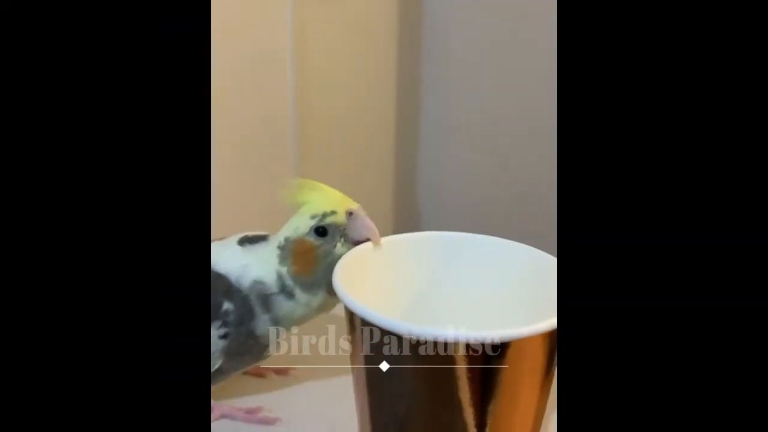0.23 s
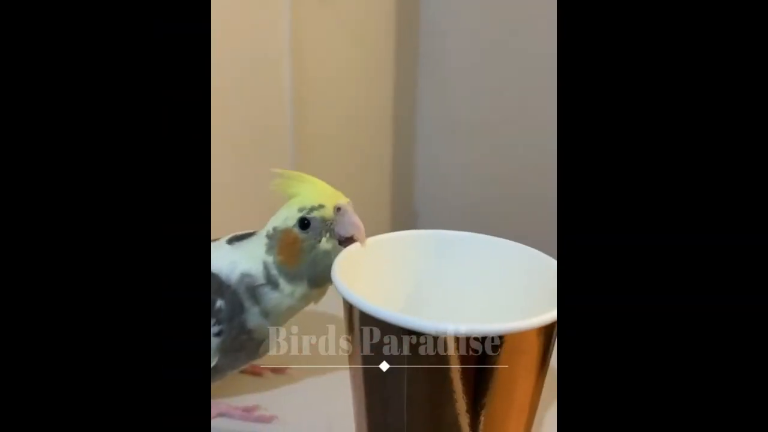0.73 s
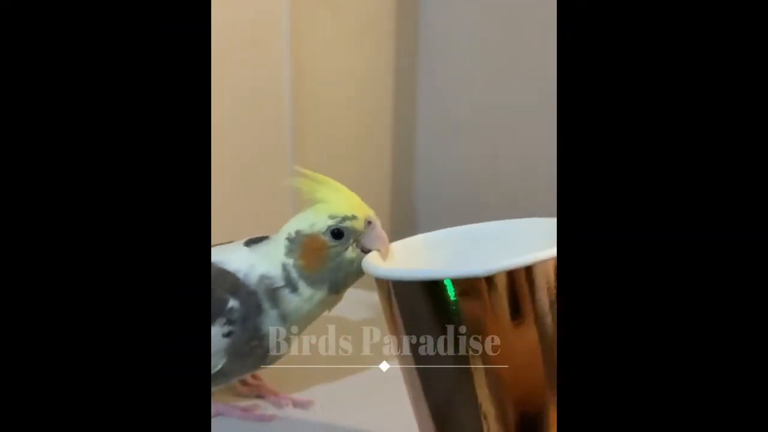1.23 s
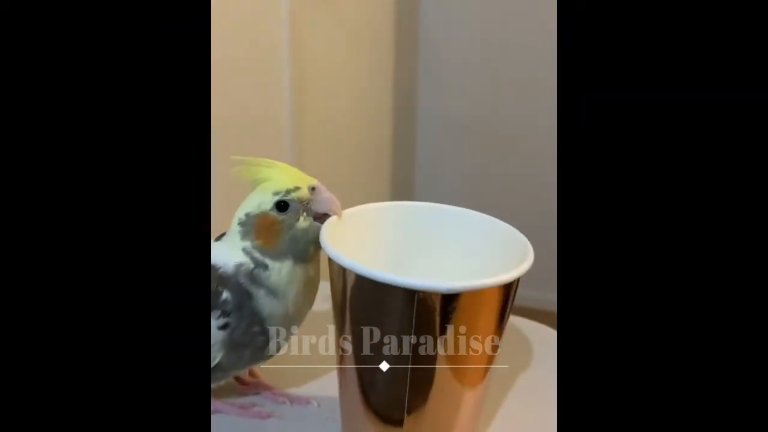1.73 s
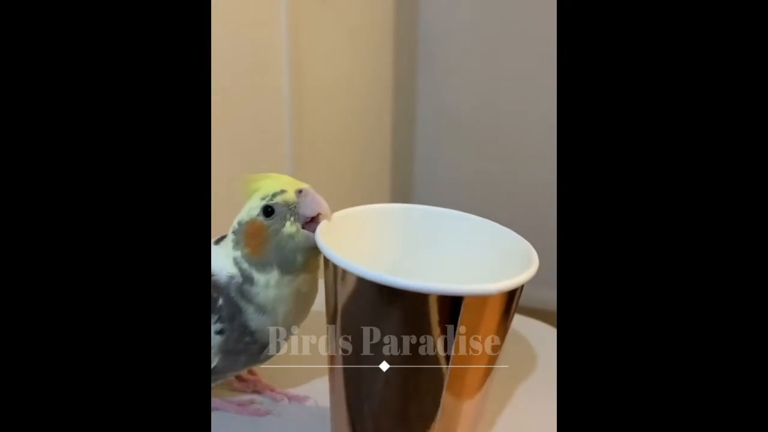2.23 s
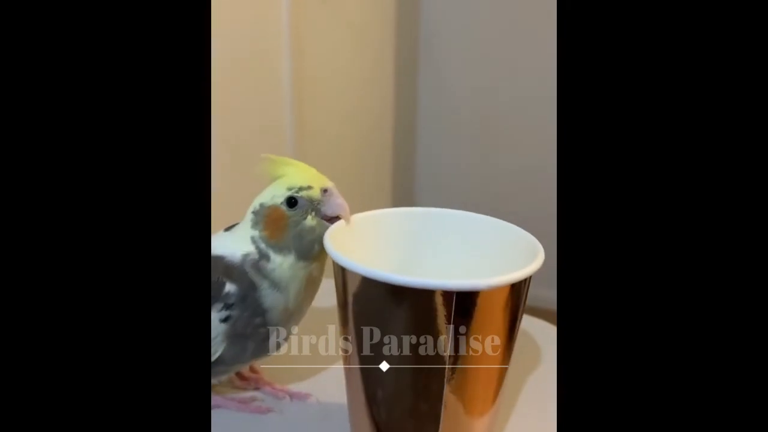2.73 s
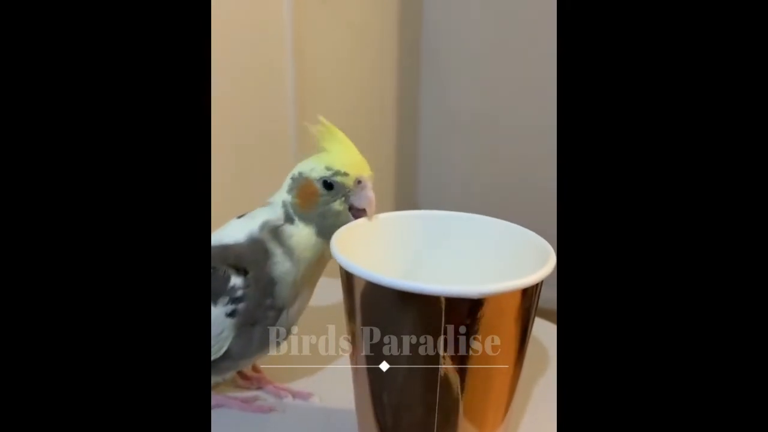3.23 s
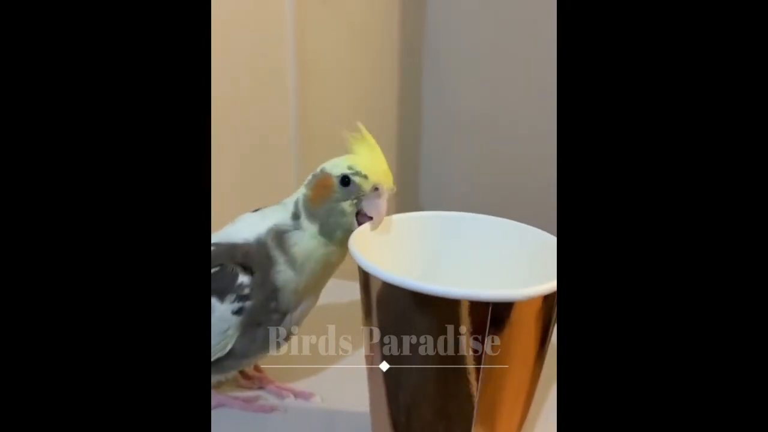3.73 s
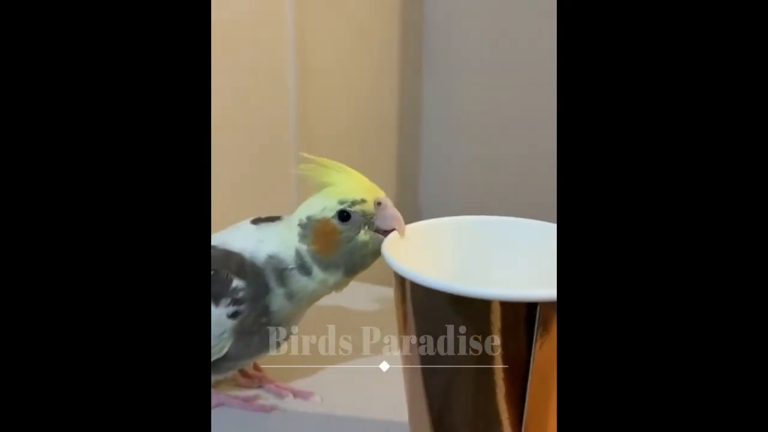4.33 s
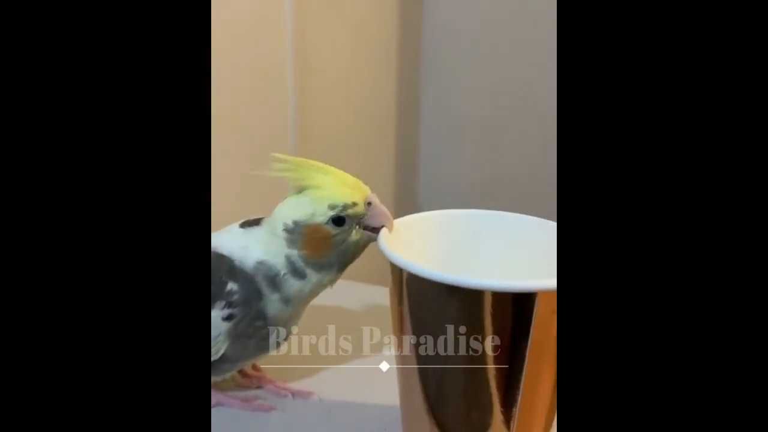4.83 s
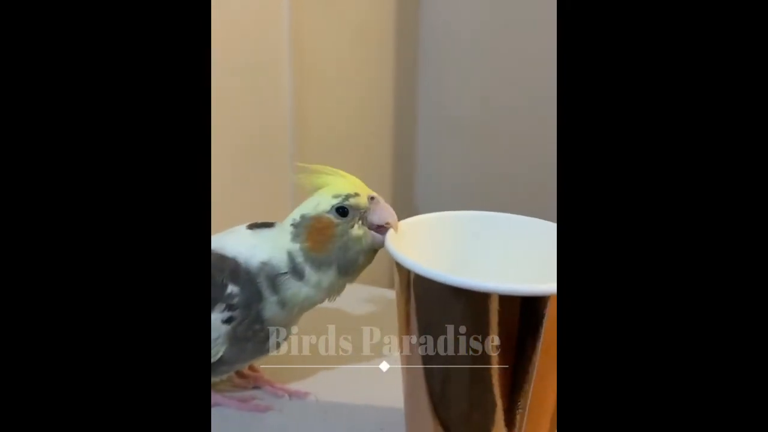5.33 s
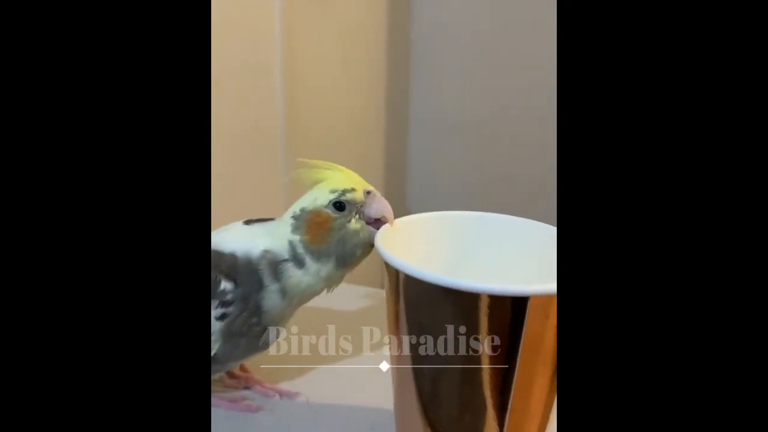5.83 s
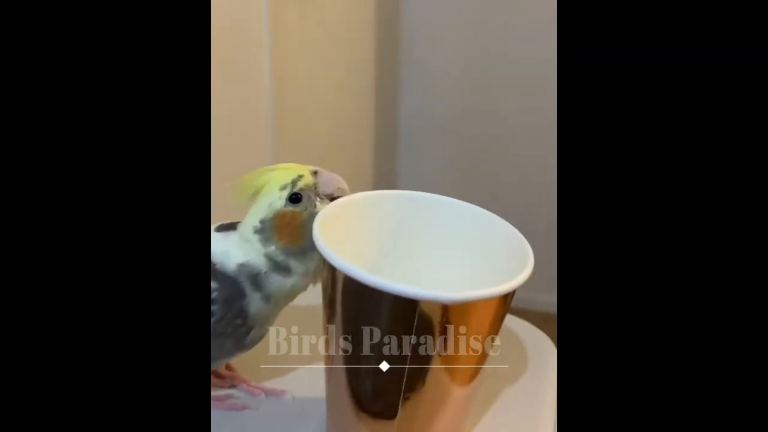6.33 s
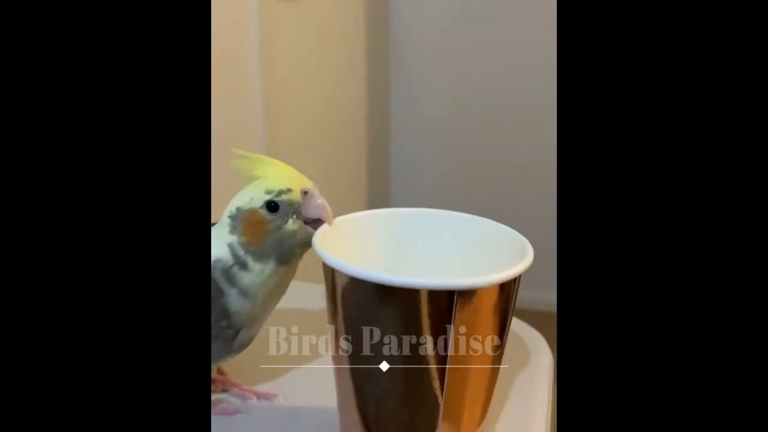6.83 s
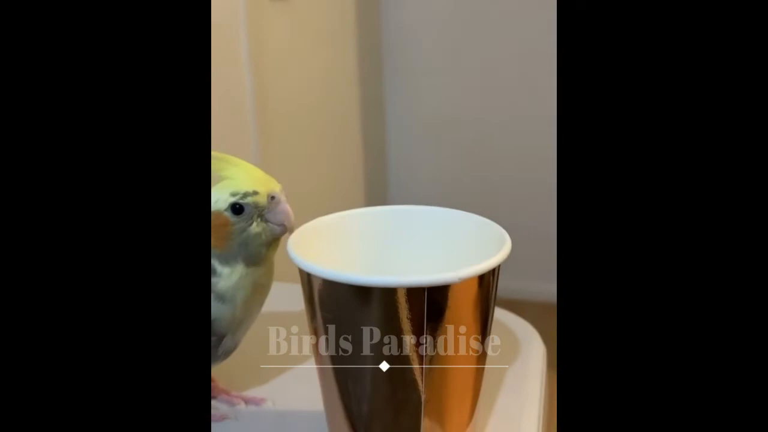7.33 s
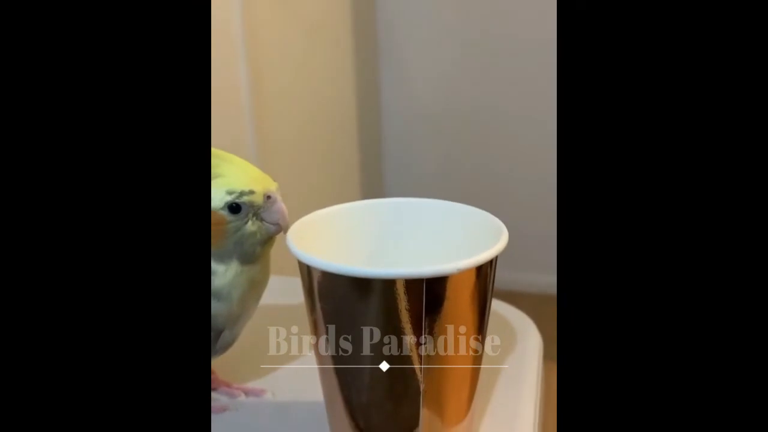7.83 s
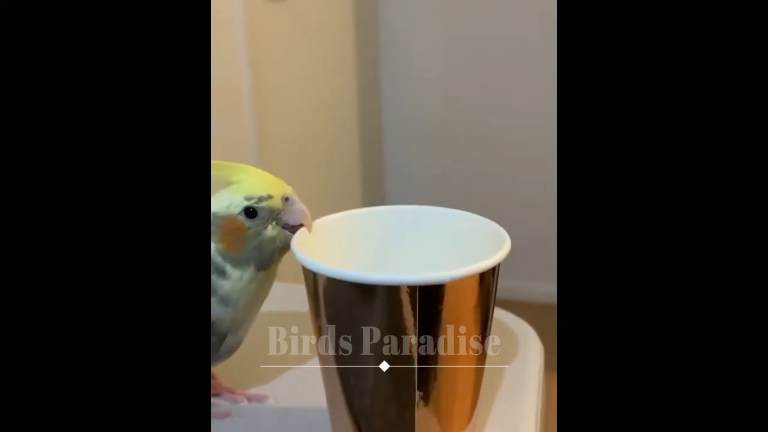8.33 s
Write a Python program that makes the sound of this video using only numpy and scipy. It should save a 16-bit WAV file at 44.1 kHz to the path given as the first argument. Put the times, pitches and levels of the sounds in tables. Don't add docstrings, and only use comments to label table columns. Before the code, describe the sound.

Irregular hollow taps and dry scratchy nibbles of a beak on an empty paper cup, with soft table thumps in a quiet room.

```python
import sys
import numpy as np
from scipy import signal
from scipy.fft import rfft, irfft
from scipy.io import wavfile
from scipy.ndimage import uniform_filter1d

SR = 44100
rng = np.random.default_rng(int(sys.argv[2]) if len(sys.argv) > 2 else 0)


def boost(x):
    u = np.asarray(x, float) / 20
    return 10 ** u


def dump(signal):
    limited = np.clip(np.atleast_2d(signal).T, -1, 1)
    pcm = np.round(limited * 32767).astype(np.int16)
    wavfile.write(sys.argv[1], SR, pcm)


N = 378378

# frequency in Hz, width in Hz, level in dB.
HOLLOW_MODES = [(432.7, 14, -16), (556.4, 56, -10.5), (663.2, 51.7, 6), (705, 86, 3)]
WALL_MODES = [(1123, 101, -2), (1197, 50.6, 5)]
RIM_MODES = [(1260, 410, -4.5), (1680, 180, -3.5), (2402, 110, 3), (3008, 244, 6.5), (3150, 750, 1),
             (4220, 850, 0.5)]
PAPER_MODES = [(5760, 246, 11), (7400, 670, 1.5), (9060, 310, 5), (9900, 364, 5), (11800, 600, -32.5)]
SHEET_MODES = [(288, 240, 2), (940, 132, 5.5), (1381, 296, 4), (1790, 365, -0.5), (2312, 590, -4.5),
               (3700, 1100, -15.5)]


def unit(x):
    return x / np.sqrt(np.mean(x ** 2))


def ring(x, modes, shift=0.9255, order=1):
    out = 0
    for k, (hz, width, db) in enumerate(modes):
        centre = min(shift * hz, 0.45 * SR)
        q = shift * hz / (width * order ** 0.94)
        b, a = signal.iirpeak(centre, q, fs=SR)
        cascade = np.tile(np.r_[b, a], (order, 1))
        out = out + (-1) ** k * boost(db) * signal.sosfilt(cascade, x)
    return out


def shaped(table):
    hz, db = np.transpose(table)
    log_f = np.log(np.fft.rfftfreq(N, 1 / SR) + 1)
    spectrum = rfft(rng.standard_normal(N)) * boost(np.interp(log_f, np.log(hz), db))
    return unit(irfft(spectrum, N))


def walk(rate):
    k = int(SR / rate)
    steps = np.repeat(rng.standard_normal(N // k + 1), k)
    return unit(uniform_filter1d(steps, k)[:N])


def add(out, s, sound, db):
    i = int(s * SR)
    part = sound[:N - i]
    out[i:i + len(part)] += part * boost(db) / np.max(np.abs(sound))


def burst(decay_s, rise_s=0.00039):
    t = np.arange(2000) / SR
    return rng.standard_normal(len(t)) * np.exp(-t / decay_s) * (1 - np.exp(-t / rise_s))


def room():
    # frequency in Hz, level in dB per Hz.
    mid_spectrum = [(12, -21), (20, -5.5), (49, 3), (240, -7.5), (742, -17.5), (4000, -53.5), (5200, -75),
                    (8800, -120)]
    side_spectrum = [(20, -20.5), (51, -10.5), (230, -14), (313, -11), (420, -12.5), (4000, -43),
                     (5200, -71), (8800, -120)]
    # frequency in Hz, width in Hz, level in dB.
    machines = [(75.3, 5.7, -63.5), (99.8, 2.2, -67.5), (139.3, 3.5, -64.5), (267.6, 9.2, -75)]
    mid_db, side_db, waver_db = -58, -64, 2.5
    hum = 0
    for hz, width, db in machines:
        tone = unit(ring(rng.standard_normal(N), [(hz, width, 0)], 0.98))
        hum = hum + boost(db + waver_db * walk(2.6)) * tone
    mid = boost(mid_db + 0.5 * walk(0.58)) * shaped(mid_spectrum) + hum
    side = boost(side_db + 0.8 * walk(2.8)) * shaped(side_spectrum)
    side = side + 0.15 * mid + 0.16 * np.roll(mid, shift=9000)
    return np.array([mid + side, mid - side])


def air_hiss():
    # frequency in Hz, level in dB per Hz.
    hiss_spectrum = [(2500, -33), (3500, -17), (5000, 3), (12500, 0.5), (13500, -43)]
    hiss_db = -87.5
    common = boost(hiss_db + 0.53 * walk(5.3)) * shaped(hiss_spectrum)
    stray = boost(hiss_db - 1) * np.array([shaped(hiss_spectrum), shaped(hiss_spectrum)])
    return common, stray


def pecks(blow_s=0.0013):
    # start in seconds, hollow ring peak in dB, ring pitch in Hz,
    # upper wall mode in dB relative to the ring.
    hard_pecks = [(0.169, -28.5, 705, -17), (0.241, -18, 640, -17), (0.267, -20, 574, -5.5),
                  (0.486, -24, 675, -26), (0.499, -30, 600, -0.5), (0.767, -21.5, 662, -17),
                  (0.852, -18.5, 665, -12.5), (0.874, -24.5, 720, -13), (0.949, -26, 680, -27),
                  (0.985, -18, 668, -37), (1.105, -26.5, 655, -15), (1.24, -20, 670, -28),
                  (1.283, -12, 622, -16), (1.294, -17, 640, -6.5), (1.322, -27.5, 640, -20),
                  (2.617, -28, 641, -17), (2.65, -30.5, 644, -11.5), (3.507, -25.5, 654, -9),
                  (3.926, -23, 640, -19), (3.957, -20, 572, -9), (4.092, -18, 648, -12.5),
                  (4.988, -31, 676, -7), (5.254, -29, 614, -6.5), (6.159, -20.5, 662, -22),
                  (6.172, -30.5, 670, -22), (6.202, -36, 660, -12), (6.207, -20, 622, -21),
                  (6.219, -15.5, 630, -25), (6.2255, -18.5, 631, -18), (6.234, -26, 680, -19),
                  (6.264, -26, 640, -31), (6.683, -22.5, 668, -22), (6.687, -26, 656, -22),
                  (6.697, -17.5, 648, -26), (6.707, -28, 655, -22), (6.717, -22.5, 717, -19),
                  (6.7245, -23, 795, 2.5), (6.733, -29, 686, -4), (0.888, -25.5, 686, -16),
                  (0.958, -25.5, 692, -16.5), (7.098, -30.5, 710, -26), (7.119, -26, 650, -35),
                  (6.954, -28, 660, -8.5), (7.108, -26.5, 647, -31)]
    # start in seconds, hollow ring peak in dB, upper wall mode in relative dB.
    nibbles = [(0.094, -39, -6.5), (0.838, -34, -32), (0.943, -23, -34), (1.431, -47, -16),
               (1.606, -49, 4.5), (1.665, -39.5, -20), (1.747, -48, 7), (1.825, -41, -2), (2.049, -31, -13),
               (2.133, -44, 0), (2.263, -44, -3.5), (2.33, -42.5, 2), (2.707, -40, -8), (2.805, -47.5, 0.5),
               (2.915, -46.5, -4), (3.006, -43.5, -3.5), (3.823, -36, -3.5), (4.518, -34.5, -20),
               (4.55, -35.5, -19), (4.696, -36, -15.5), (4.954, -40, -10), (5.079, -38, -7.5),
               (5.37, -43.5, -12), (5.887, -56, 5.5), (6.615, -43, -5.5), (6.763, -27.5, -10.5),
               (6.934, -33, -10.5), (7.983, -50, 10), (8.155, -35.5, -9.5), (8.379, -36.5, -21)]
    nibble_hz = 647
    damping, wall_scatter = 1.21, 0.036
    tick_db, tick_s = -12, 0.00033
    out, t = np.zeros(N), np.arange(3000) / SR
    hollow = [(hz, width * damping, db) for hz, width, db in HOLLOW_MODES]
    wall = [(hz, width * damping, db) for hz, width, db in WALL_MODES]
    blows = list(hard_pecks) + [(s, db, nibble_hz, wall_db) for s, db, wall_db in nibbles]
    for s, db, hz, wall_db in blows:
        start = s - 0.0015
        roughness = 1 + 0.51 * rng.standard_normal(len(t))
        push = roughness * np.exp(-t / blow_s) * np.sin(np.pi * t / blow_s)
        wall_shift = 0.9087 + wall_scatter * rng.standard_normal()
        add(out, start, ring(push, hollow, hz / 650), db - 6.0)
        add(out, start, ring(push, wall, wall_shift), db + wall_db + 2.5)
        tick = ring(burst(tick_s), SHEET_MODES + RIM_MODES)
        add(out, start, tick, db + max(wall_db, -12) + tick_db)
    return out


def bites(knock_s=0.0029, crack_s=0.00076, snap_s=0.0008):
    # start in seconds, rim knock peak in dB, knock pitch in Hz, paper crack in relative dB.
    rim_bites = [(0.173, -48, 1390, 0), (0.2383, -43.5, 1710, -5), (0.2657, -48, 1470, -7),
                 (0.9473, -36, 1910, 1.5), (1.1882, -48.5, 1810, 8.5), (1.2368, -43, 1930, -17),
                 (1.256, -38.5, 1890, 7), (1.282, -25.5, 1524, 7), (1.744, -47, 1290, -2),
                 (2.0483, -49.5, 1680, -4.5), (3.926, -52, 1610, 2), (3.9577, -38.5, 1742, 11),
                 (4.0312, -42.5, 1860, -30.5), (4.0994, -42, 1472, -19.5), (8.571, -45.5, 3840, -18.5),
                 (6.706, -43, 1750, -10), (6.722, -34.5, 1750, 6.5), (6.9334, -56.5, 1900, 3.5),
                 (4.634, -55, 1820, -31), (7.0334, -35.5, 2220, -22), (7.097, -36, 2120, -26),
                 (7.1092, -35, 2050, -25), (7.118, -40, 1950, -28), (7.122, -39.5, 2600, -26),
                 (7.9798, -35.5, 2840, -11), (8.0598, -34.5, 2050, -4), (8.1183, -42.5, 4050, -5),
                 (8.168, -40, 1640, -8), (8.209, -30, 1730, -28), (8.222, -45, 1880, -10),
                 (8.208, -32, 3920, -26), (2.1307, -45, 3700, -15), (6.2163, -40, 2706, 0),
                 (8.2077, -25.5, 2936, -17)]
    # start in seconds, peak in dB, pitch in Hz.
    taps = [(0.499, -41, 1640), (0.696, -47, 1490), (0.82, -46, 1430), (1.1443, -58, 1790),
            (1.21, -42, 1740), (1.6656, -61, 1300), (2.2443, -63, 1330), (2.3057, -48, 2010),
            (2.5105, -54, 2050), (2.6497, -48, 1640), (2.801, -41, 1280), (3.5047, -45, 1580),
            (3.5813, -42, 1310), (3.7364, -46.5, 2920), (3.8197, -44, 1300), (4.5184, -47, 1800),
            (4.6952, -44.5, 1340), (4.774, -47, 1680), (4.9883, -55, 1430), (5.0764, -53, 1820),
            (5.1946, -55, 1290), (5.2533, -53, 1730), (5.463, -50, 1540), (5.778, -45, 1490),
            (5.886, -54, 1410), (6.143, -52, 1440), (6.6129, -53, 2280), (7.008, -53, 2230),
            (8.4186, -44, 1260), (8.4687, -44.5, 2950), (8.553, -44.5, 1320)]
    # start in seconds, peak in dB, pitch in Hz.
    snaps = [(0.4818, -39, 6140), (0.4995, -35.5, 6200), (0.7783, -40, 6000), (0.854, -36, 7150),
             (0.939, -37, 7800), (0.9896, -37, 7840), (1.2852, -24, 7750), (1.3116, -34, 4890),
             (1.3957, -33, 7400), (1.7463, -41.5, 6300), (2.045, -37, 7000), (2.2454, -42.5, 7150),
             (2.5537, -58.5, 5370), (2.8037, -49, 6780), (3.582, -41, 7560), (3.6294, -44, 5450),
             (3.926, -49, 7160), (3.971, -20.5, 5760), (4.7775, -48.5, 5140), (5.2536, -44.5, 7000),
             (5.464, -52, 6900), (6.1746, -36, 7830), (6.1839, -32, 7600), (6.1922, -26, 5300),
             (6.227, -33.5, 7210), (6.6126, -42.5, 5130), (6.704, -27.5, 5300), (7.9826, -28.5, 6760),
             (8.0592, -38, 5540), (8.5709, -37.5, 8260), (8.2085, -34, 11900), (8.572, -38, 12000),
             (7.981, -43, 12200), (1.282, -42.5, 12200), (1.294, -31, 6470)]
    more_snaps = [(0.2389, -56, 7450), (0.266, -43, 5770), (0.7552, -51, 6600), (0.83, -40, 7400),
                  (1.1902, -56, 5790), (1.2082, -52, 6600), (1.2389, -32.5, 6800), (1.6886, -47, 7400),
                  (2.0313, -58, 6380), (2.329, -52, 6500), (2.5591, -42, 5430), (2.8946, -45, 6960),
                  (3.5718, -51, 7000), (3.9538, -30, 5430), (4.5046, -52, 6900), (5.5099, -57, 6800),
                  (6.1447, -44.5, 7220), (6.6742, -42, 6580), (6.6804, -39, 5430), (7.0534, -42.5, 6500),
                  (8.0744, -38, 6000), (8.119, -31, 5340), (8.1686, -45, 6930), (8.2347, -45, 5860),
                  (8.2538, -45, 6050)]
    tap_db, tap_paper_db = -8, -10
    out = np.zeros(N)
    knocks = list(rim_bites) + [(s, db + tap_db, hz, tap_paper_db) for s, db, hz in taps]
    for s, db, hz, paper_db in knocks:
        blow = burst(knock_s)
        knock = ring(blow, RIM_MODES, order=2) + ring(blow, [(hz, 110, 15)], 0.97, order=2)
        add(out, s - 0.0005, knock, db + 5)
        add(out, s - 0.0005, ring(burst(crack_s), PAPER_MODES, order=2), db + paper_db + 4.0)
    for s, db, hz in list(snaps) + list(more_snaps):
        modes = PAPER_MODES + [(hz, 900, 6), (13500, 2500, -12)]
        add(out, s - 0.001, ring(burst(snap_s, rise_s=0.0014), modes, order=2), db - 0.5)
    return out


def slips(rate, spread_db, jerk_db):
    click = (rng.random(N) < rate / SR) * rng.choice([-1, 1], N)
    click = click * boost(spread_db * rng.exponential(size=N))
    return click * boost(jerk_db * walk(120))


def contact(s, held_s, db, rise_db_s, fall_db_s):
    t = np.arange(0, N, 32)[None] / SR
    s, held_s, db = s[:, None], held_s[:, None], db[:, None]
    rise = rise_db_s * np.maximum(s - t, 0)
    fall = fall_db_s * np.maximum(t - s - held_s, 0)
    gain = boost(db - rise - fall).sum(axis=0)
    return np.interp(np.arange(N) / SR, t[0], gain)


def fluttering(x, modes, depth_db):
    return unit(sum(boost(depth_db * walk(35)) * ring(x, [mode], order=2) for mode in modes))


def drag():
    # start in seconds, held time in seconds,
    # hollow ring in dB, paper hiss in relative dB.
    scrapes = [(0.836, 0.067, -36, -16), (0.938, 0.047, -33.5, -23), (1.12, 0.23, -55, -17),
               (1.288, 0.043, -28.5, -27), (1.349, 0.1, -35.5, -26.5), (2.599, 0.13, -50, -38),
               (5.45, .35, -71.5, -22), (3.937, 0.04, -35.5, -13), (4.077, 0.06, -48, -49),
               (4.511, 0.039, -49, -12.5), (4.752, 0.039, -56, -7.5), (5.234, 0.021, -57, -12),
               (6.161, 0.046, -36.5, -16), (6.198, 0.045, -35.5, -24), (6.259, 0.088, -51, -52),
               (6.684, 0.021, -35, -20), (6.72, 0.026, -48, -30), (7.11, 0.017, -54, -59)]
    # start in seconds, held time in seconds,
    # rustle in dB, hollow ring in relative dB.
    rubs = [(.27, 0.041, -56, 6.5), (.36, .14, -54.5, -10), (.52, 0.16, -55, -4), (1.03, 0.16, -64.5, 9),
            (1.547, 0.31, -63.5, 2.5), (1.9, 0.42, -69, 7.5), (2.12, 0.29, -67.5, -21),
            (2.799, 0.32, -69, 0), (2.952, 0.073, -65.5, 3), (3.152, 0.14, -74, 7),
            (3.549, 0.32, -73, 11.5), (3.98, 0.11, -57, -20), (4.12, 0.21, -74, 2), (4.6, 0.16, -68.5, -2),
            (4.94, 0.41, -77, 0), (5.3, 0.25, -86, 12.5), (5.752, 0.049, -68, -11), (6.56, 0.073, -76, 18),
            (6.75, 0.082, -58.5, 2), (7.038, 0.018, -57.5, -9), (7.101, 0.047, -60, 1),
            (7.14, 0.067, -62.5, -12), (7.23, 0.061, -78.5, -12), (4.51, 0.038, -66, -11),
            (4.76, 0.022, -69.5, -17), (5.26, 0.017, -67, -9), (8.24, 0.014, -57, -12),
            (7.712, 0.044, -69.5, -13), (7.989, 0.015, -59, -10), (8.05, 0.17, -71, -7),
            (8.209, 0.022, -60, -24), (8.28, 0.12, -66.5, -21), (8.46, 0.019, -99, -7),
            (8.552, 0.021, -64, -4)]
    # start in seconds, held time in seconds, hiss in dB.
    grinds = [(.3, 0.2, -68), (.55, 0.06, -92), (0.741, 0.048, -59), (1.18, 0.025, -65.5), (1.6, 0.12, -75),
              (2.02, 0.043, -77), (2.13, 0.041, -73), (2.24, 0.024, -96), (2.551, 0.037, -58.5),
              (2.7, 0.055, -66.5), (2.86, 0.074, -78.5), (3.07, 0.026, -77), (3.29, 0.012, -86),
              (3.42, 0.015, -73.5), (3.5, 0.018, -72), (3.57, .2, -69.5), (3.83, 0.1, -78),
              (4.03, 0.062, -59.5), (4.96, 0.029, -76.5), (5.06, 0.013, -77), (5.36, 0.0074, -75),
              (5.5, 0.027, -86), (5.66, 0.013, -81), (5.76, 0.017, -94), (6.552, 0.034, -70.5),
              (6.78, 0.064, -73.5), (7.051, 0.022, -59.5), (8.06, 0.136, -61), (8.225, 0.029, -56),
              (8.3, 0.092, -71), (1.3, 0.12, -62.5), (8.46, 0.051, -76)]
    scrape_rise, rub_rise, grind_rise = 2000, 589, 896
    scrape_fall, rub_fall, grind_fall = 401.5, 224.5, 509
    free_ring = 0.7

    s, held, db, paper_db = np.transpose(scrapes)
    scrape = contact(s, held, db, scrape_rise, scrape_fall)
    scrape_paper = contact(s, held, db + paper_db, scrape_rise, scrape_fall)
    s, held, db, hollow_db = np.transpose(rubs)
    slide = contact(s, held, db, rub_rise, rub_fall)
    slide_hollow = contact(s, held, db + hollow_db, rub_rise, rub_fall)
    slide_paper = contact(s, held, db, rub_rise, grind_fall)
    grind = contact(*np.transpose(grinds), grind_rise, grind_fall)

    hollow = scrape + slide_hollow
    wall = boost(-10.5) * scrape + boost(-2) * slide
    rim = slide + boost(0.5) * grind
    paper = scrape_paper + boost(-20) * slide_paper + grind

    low = slips(2500., 0.35, 2.4)
    rub = slips(6000., 1.6, 3)
    grit = slips(3000., 2.2, 5.5)
    lone_fibres = slips(60., 2.5, 1)
    crackle = boost(-7) * unit(ring(lone_fibres, WALL_MODES + RIM_MODES))
    free_hollow = [(hz, width * free_ring, db) for hz, width, db in HOLLOW_MODES]
    body = hollow * unit(ring(low, free_hollow, 0.94, order=2))
    body = body + wall * unit(ring(low, WALL_MODES, order=2))
    rustle = fluttering(rub, SHEET_MODES, 3)
    hiss = fluttering(grit, PAPER_MODES, 4.5)
    rasp = fluttering(rub, RIM_MODES, 3)

    out = body + boost(-16.5) * scrape * unit(rasp + rustle)
    out = out + (slide + grind) * crackle
    return out + rim * boost(2) * rustle + paper * boost(7.5) * hiss


def thumps():
    # start in seconds, peak in dB, pitch in Hz,
    # 60 dB decay time in seconds.
    table_thumps = [(0.967, -45, 147, 0.19), (1.285, -46.5, 203, 0.093), (2.317, -48, 143.4, 0.78),
                    (3.957, -41.5, 160, 0.049), (4.497, -48, 65, 0.26), (4.552, -38.5, 68, 0.15),
                    (4.658, -43, 69.4, 0.052), (5.25, -53.5, 145, 0.09), (6.716, -40.5, 153, 0.077),
                    (6.949, -59, 54, 0.13), (7.152, -51, 141.5, 0.34), (8.208, -42.5, 140.7, 0.17)]
    out, t = np.zeros(N), np.arange(12000) / SR
    for s, db, hz, t60 in table_thumps:
        fade = np.exp(-np.log(1000) * t / max(t60, 0.02)) * (1 - np.exp(-t * hz))
        add(out, s, fade * np.sin(2 * np.pi * hz * t), db)
    return out


def rock(width_hz=240.0):
    start_s, held_s, level_db, sag_db_s = 7.125, 0.075, -43, 123
    from_hz, to_hz, glide_s = 850, 368, 0.014
    t = np.arange(N) / SR - start_s
    hz = to_hz + (from_hz - to_hz) * np.exp(-np.maximum(t, 0) / glide_s)
    phase = 2 * np.pi * np.cumsum(hz) / SR
    rough = walk(width_hz) * np.cos(phase) + walk(width_hz) * np.sin(phase)
    return rough * boost(level_db - sag_db_s * np.abs(t)) * (t > 0) * (t < held_s)


def ports(x):
    # frequency in Hz, phase by which the left port leads in radians.
    lead_curve = [(0, 0), (340, -1.2), (1120, -1), (1810, .2), (2410, 2.2), (4000, 2.6), (5100, np.pi)]
    # frequency in Hz, left minus right level in dB.
    balance_curve = [(100, 2.5), (700, 3), (1200, -.5), (2200, 0)]
    flips_hz, flip_width_hz = np.array([5700, 7900, 9950, 12000]), 1000
    f = np.fft.rfftfreq(N, 1 / SR)
    flips = np.clip((f - flips_hz[:, None]) / flip_width_hz + 0.5, 0, 1).sum(axis=0)
    lead = np.interp(f, *np.transpose(lead_curve)) + np.pi * flips
    balance_db = np.interp(f, *np.transpose(balance_curve))
    tilt = boost(balance_db / 2) * np.exp(0.5j * lead)
    return irfft(rfft(x) * np.array([tilt, 1 / tilt]), N)


def echo(x):
    t60_s, level_db, top_hz = 0.09, -7.5, 9000
    t = np.arange(SR // 2) / SR
    tail = rng.standard_normal((2, len(t))) * np.exp(-np.log(1000) * t / t60_s) * (t > 0.002)
    tail /= np.sqrt(np.sum(tail ** 2, axis=1, keepdims=True))
    tail = signal.lfilter(*signal.butter(1, top_hz, fs=SR), tail)
    return boost(level_db) * signal.fftconvolve(x[None], tail, axes=1)[:, :N]


def scene():
    cup = pecks() + bites() + drag() + thumps() + rock()
    air, stray = air_hiss()
    return ports(cup + air) + stray + echo(cup) + room()


def low_pass(x):
    return signal.sosfilt(signal.butter(12, 14160, fs=SR, output="sos"), x)


def record(dry):
    return low_pass(dry)


dry = scene()
out = record(dry)
dump(out)
```